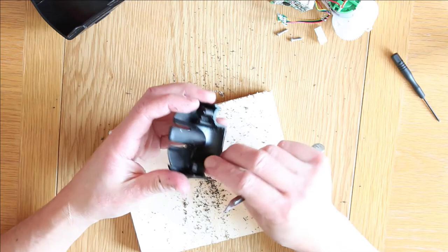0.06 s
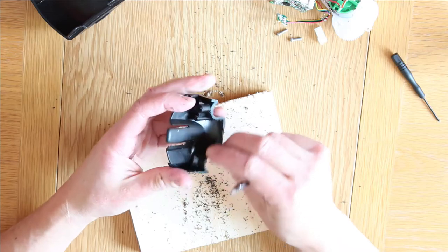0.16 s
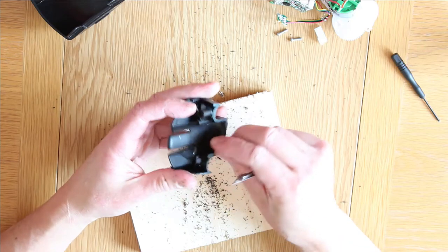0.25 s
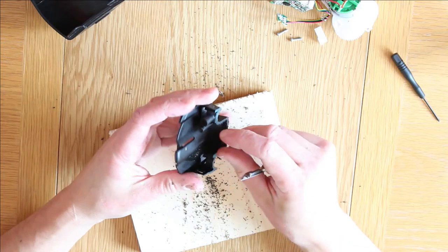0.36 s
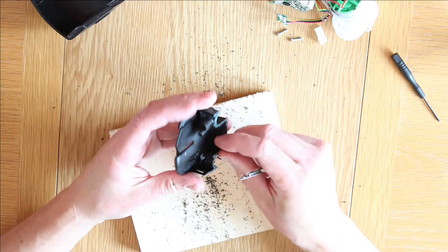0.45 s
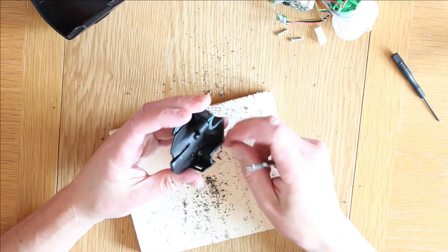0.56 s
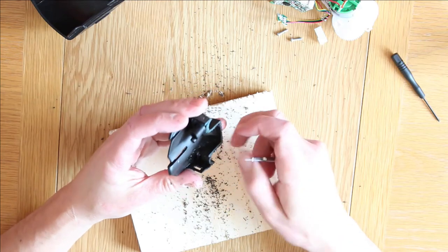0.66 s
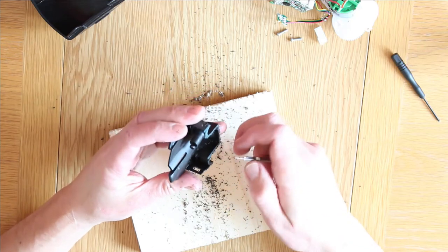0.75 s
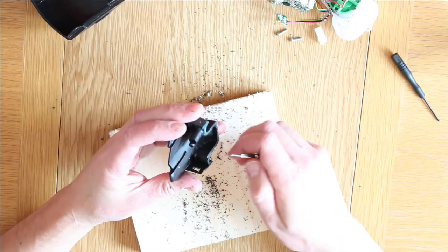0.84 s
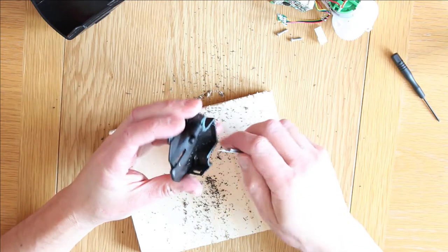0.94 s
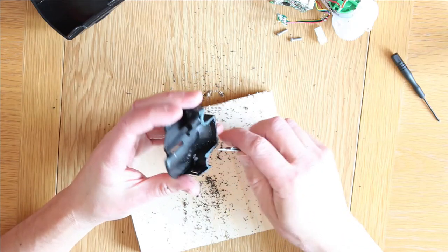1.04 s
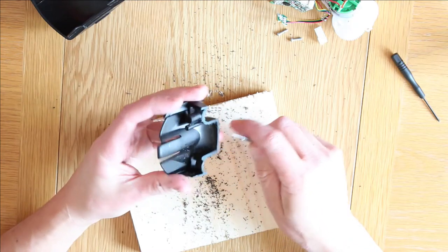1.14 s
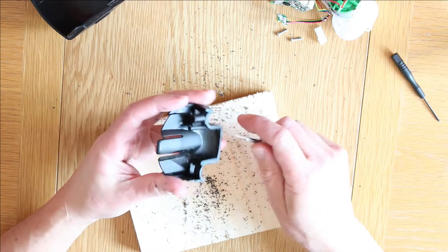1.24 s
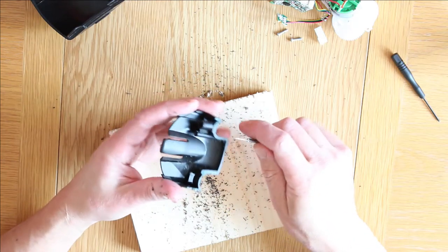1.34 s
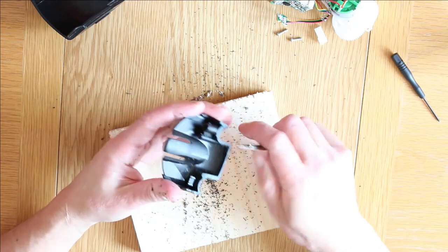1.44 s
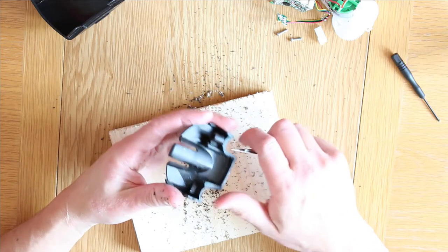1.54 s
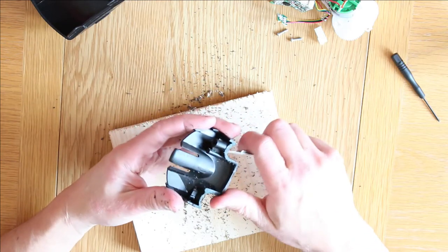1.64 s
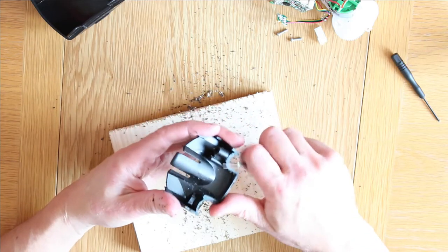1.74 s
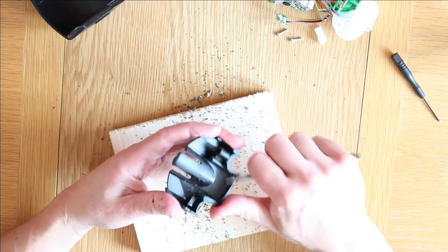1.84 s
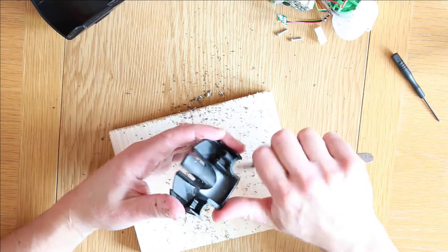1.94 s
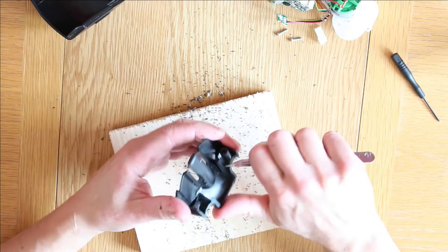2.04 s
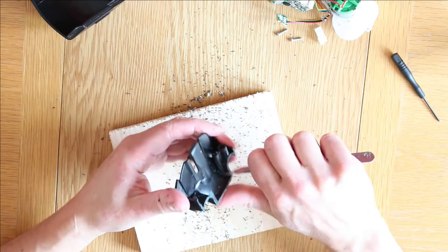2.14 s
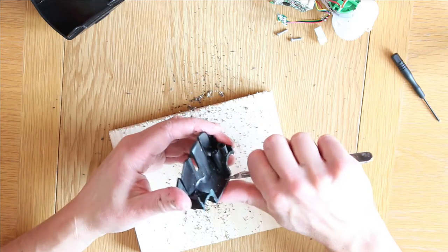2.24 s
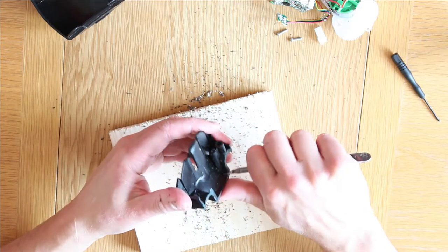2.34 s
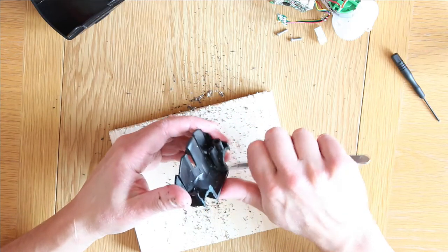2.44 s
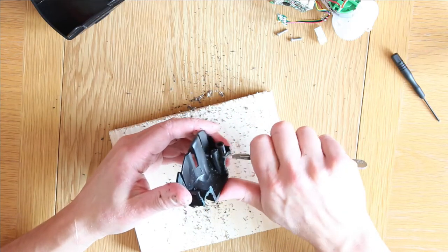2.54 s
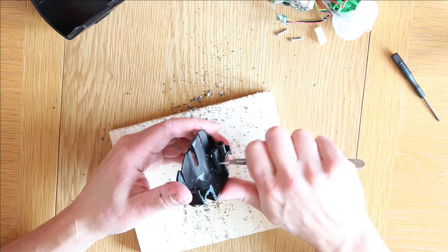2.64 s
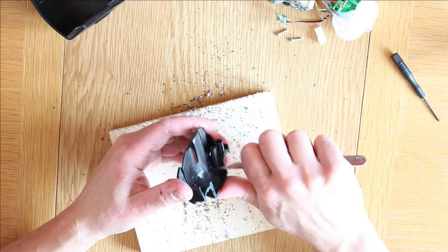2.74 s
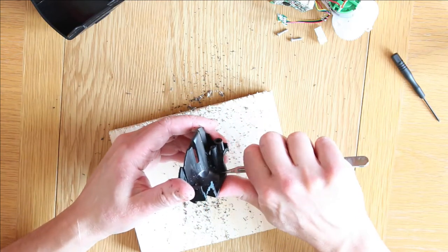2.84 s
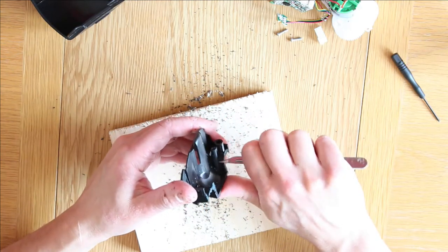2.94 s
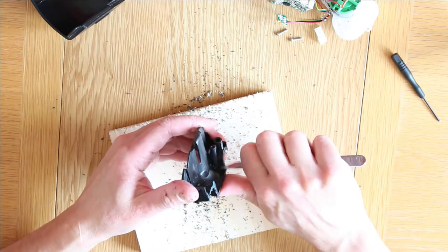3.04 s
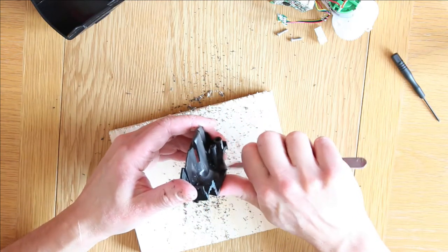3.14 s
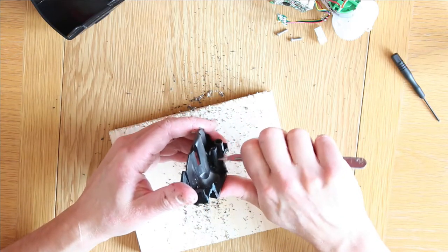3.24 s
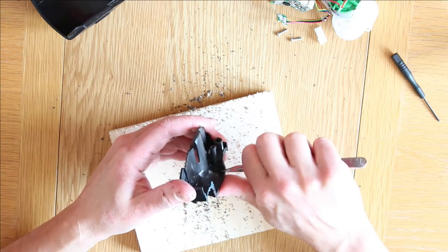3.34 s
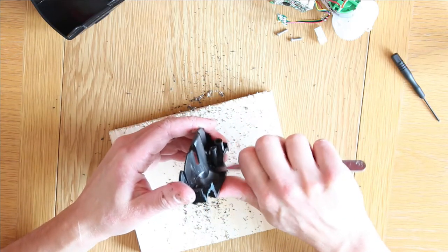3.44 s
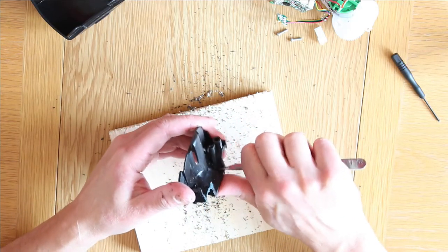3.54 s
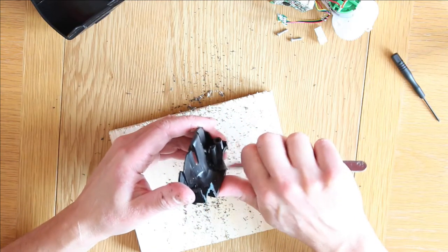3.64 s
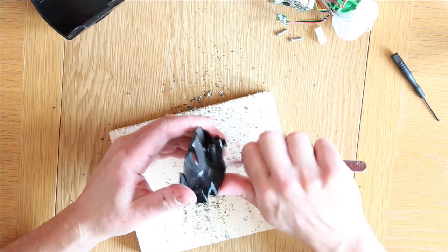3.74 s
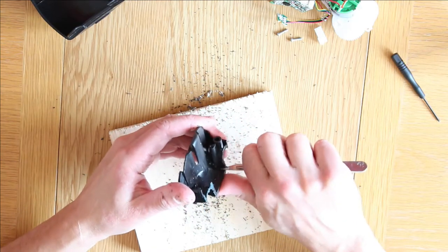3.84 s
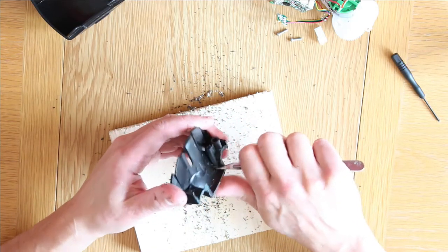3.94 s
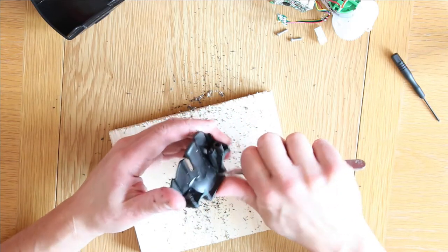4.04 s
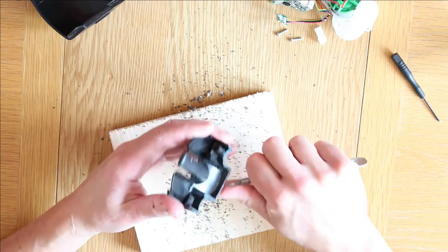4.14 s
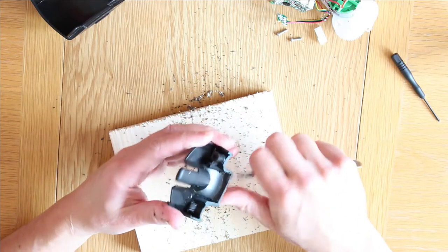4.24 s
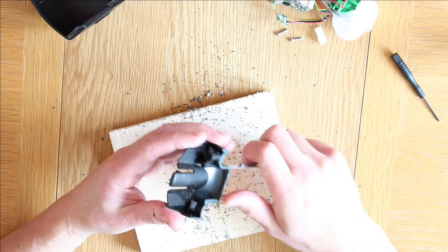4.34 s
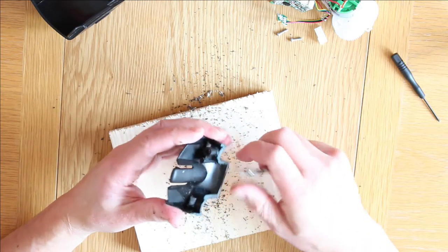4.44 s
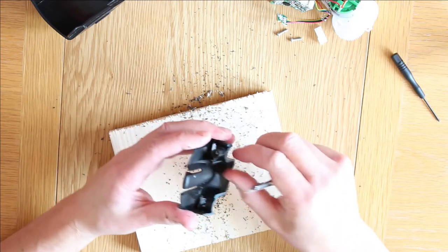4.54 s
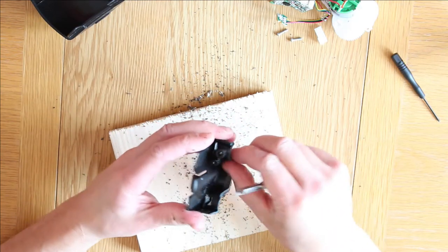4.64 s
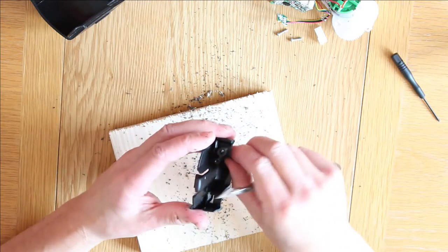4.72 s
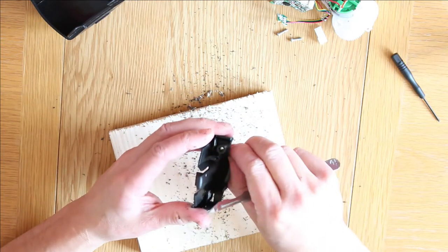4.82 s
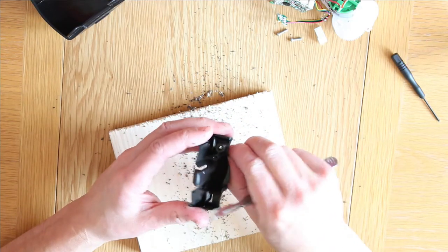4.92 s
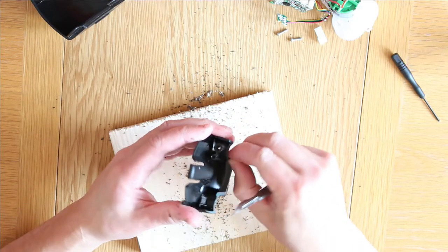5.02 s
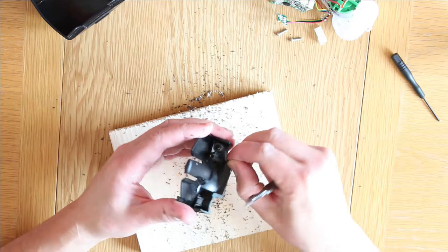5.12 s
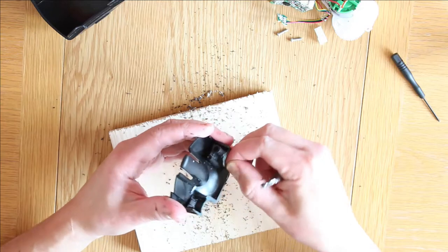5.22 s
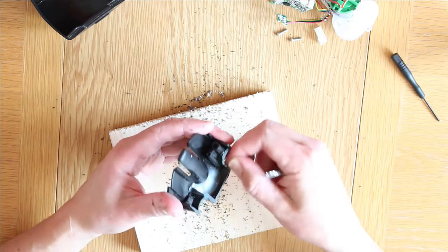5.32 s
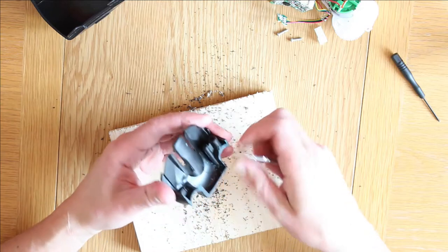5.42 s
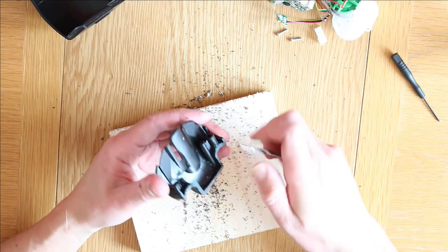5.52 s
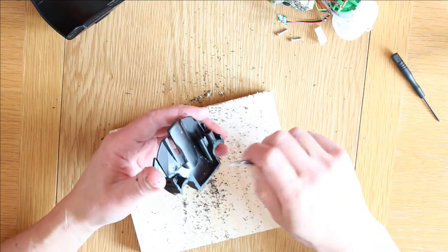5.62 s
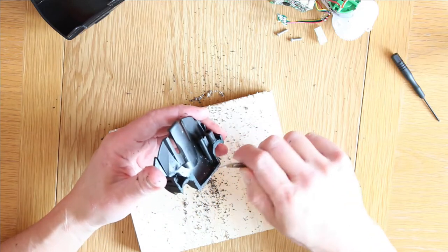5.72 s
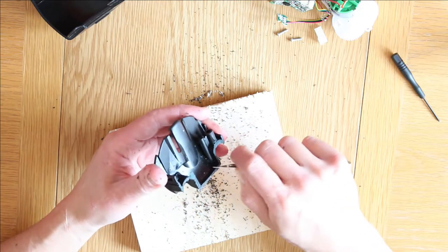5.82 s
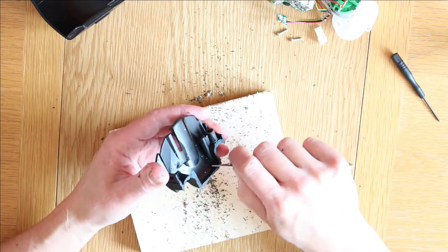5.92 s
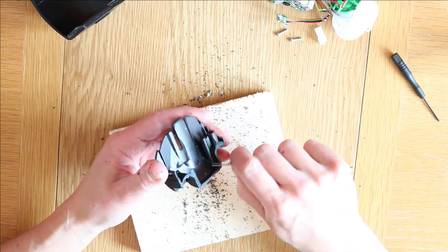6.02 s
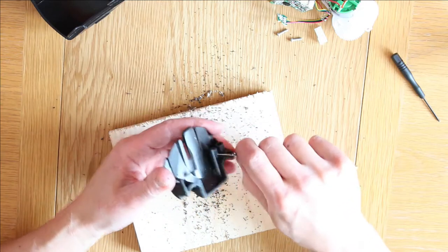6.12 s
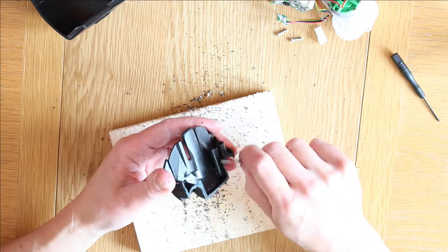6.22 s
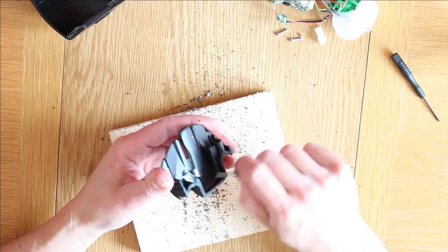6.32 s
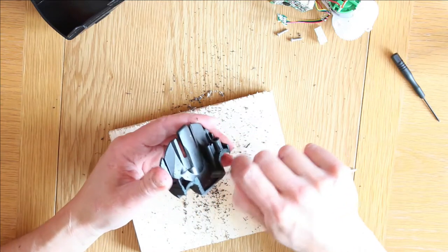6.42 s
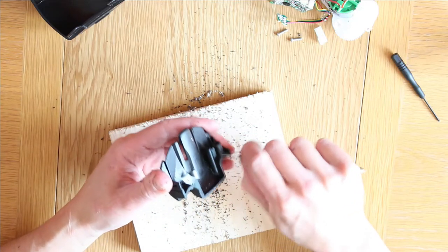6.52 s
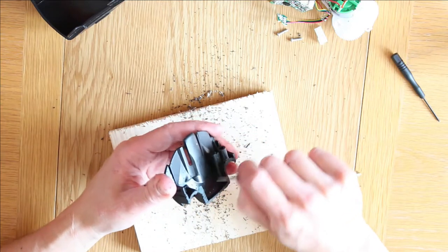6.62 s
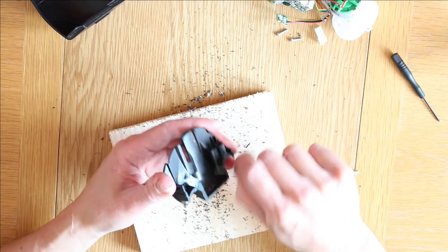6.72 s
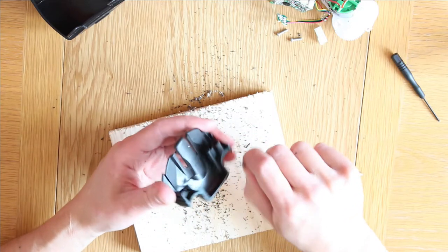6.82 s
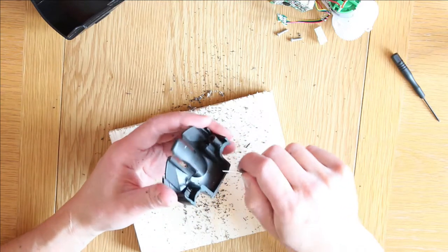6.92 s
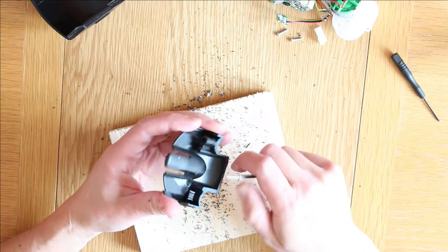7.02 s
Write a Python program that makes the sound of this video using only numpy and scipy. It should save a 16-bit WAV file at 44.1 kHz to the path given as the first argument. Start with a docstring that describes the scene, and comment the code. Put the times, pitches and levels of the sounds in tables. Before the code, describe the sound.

A small steel blade works on a light, hollow plastic shell held in the hand, in a small room with a short diffuse echo, slightly left of centre. Soft hiss runs throughout, with a barely perceptible low hum fading at the start. Until 1.8 s it is almost silent: faint scuffs at 0.07 and 0.2 s, a tiny squeak and soft scrape near 0.7 s. A tick and woody scrape come at 1.8-1.9 s, light taps at 2.0-2.4, then two sharp, quick scratches around 2.5 s. Short gritty strokes follow unevenly from 2.75 to 4.2 s, strongest at 3.3, 3.55 and especially 3.8 s, each swelling and stopping abruptly. Quiet returns until faint taps at 5.9-6.0 s. A loud, bright, crackling scrape with a snap hits at 6.1 s, then a dense cluster at 6.4-6.6 s and a last rasp at 6.75 s, dying into hiss.

```python
"""A small knife scrapes burrs off a hand-held plastic shell, over a table in a small room.
The blade ticks onto the edge, then sticks and slips along it in short strokes; every slip is a
jerk of force that excites damped modes of shell and blade, coloured by the way of touching.
One faint squeak is a sine of unsteady frequency. Echoes and a diffuse tail of decaying noise form
the room; a faint hiss of coloured noise and a fading low sine hum run beneath."""
import sys
import numpy as np
from scipy import signal
from scipy.fft import rfft, irfft, next_fast_len
from scipy.io import wavfile

SR = 44100
rng = np.random.default_rng(int(sys.argv[2]) if len(sys.argv) > 2 else 0)


def pcm_store(signal):
    """Save signal as 16-bit PCM."""
    levels = np.round(np.clip(np.atleast_2d(signal), -1, 1) * 32767)
    wavfile.write(sys.argv[1], SR, levels.astype(np.int16).T)


N = 311787

EDGE_HZ = 3100   # crossover above which the keenness of the blade is heard
PAN_DB = 2.1   # added on the left and taken off on the right


def from_db(db):
    """Level as a logarithm of amplitude: 20 dB is a factor of ten in gain."""
    return 10 ** (np.asarray(db) / 20)


def pan(left_db):
    """Level difference between channels: left is raised and right lowered by left_db."""
    return from_db([[left_db], [-left_db]])


def at_hz(points, hz):
    """Linear interpolation of a table on a logarithmic frequency axis."""
    f, value = np.transpose(points)
    return np.interp(np.log(np.maximum(hz, 1)), np.log(f), value)


def unit_energy(x):
    """Normalisation of the summed squares to an average of one per channel."""
    mean_energy = np.mean(np.sum(x ** 2, axis=-1))
    return x / np.sqrt(mean_energy + 1e-20)


def add(track, s, x):
    """Superposition: mix stereo x into the track from time s (seconds) on."""
    i = max(int(s * SR), 0)
    track[:, i:i + x.shape[1]] += x[:, :N - i]


def stereo_noise(likeness, size):
    """Partial coherence: independent mid and side noises set the correlation at each frequency."""
    mid, side = rfft(rng.standard_normal((2, size)))
    alike = np.clip(at_hz(likeness, np.fft.rfftfreq(size, 1 / SR)), -.99, .99)
    mid = np.sqrt((1 + alike) / 2) * mid
    side = np.sqrt((1 - alike) / 2) * side
    return irfft(mid + side * [[1], [-1]], size)


def colour(spectrum, size=4096):
    """Minimum phase: folding the cepstrum gives a causal impulse response of this spectrum."""
    gain = from_db(at_hz(spectrum, np.fft.rfftfreq(size, 1 / SR)))
    cepstrum = irfft(np.log(gain))
    cepstrum[1:size // 2] *= 2
    cepstrum[size // 2 + 1:] = 0
    return unit_energy(irfft(np.exp(rfft(cepstrum))))


def convolve(a, b):
    """Linear system: the output is the input convolved with the impulse response."""
    return signal.fftconvolve(np.atleast_2d(a), np.atleast_2d(b), axes=1)[:, :N]


def shelf(x, hz, db, kind):
    """Crossover: split into two bands, change the level of one, and sum them again."""
    total = 0
    for side in ("low", "high"):
        # the same filter twice, so that the two bands sum flat
        sos = np.tile(signal.butter(2, hz, side, fs=SR, output="sos"), (2, 1))
        gain = from_db(db) if side == kind else 1
        total = total + signal.sosfilt(sos, x) * gain
    return total


def background(hiss_left_db=0.66, hum_right_db=-9):
    """Stationary noise: room and microphone hiss, over a low sine hum of exponential decay."""
    # relative spectrum of the hiss: f/Hz, level/dB
    hiss_spectrum = [(28, -2), (55, -10.5), (140, -4), (265, -5), (650, -8.5), (1300, -11.5), (4660, -17.5),
                     (10000, -24.5), (16000, -32.5)]
    # left-right coherence of the hiss: f/Hz, correlation
    hiss_likeness = [(60, -0.47), (300, -0.49), (1000, -0.65), (2400, -0.48), (8000, -0.075), (15000, 0.35)]
    hiss_db = -54.5
    hum_hz, hum_db, hum_fall_db_per_s = 26.9, -54, 8
    t = np.arange(N) / SR
    noise = stereo_noise(hiss_likeness, next_fast_len(N))[:, :N]
    hiss = from_db(hiss_db) * convolve(noise, colour(hiss_spectrum)) * pan(hiss_left_db)
    # the factor 2 puts the starting peak 6 dB above hum_db
    hum = from_db(hum_db - hum_fall_db_per_s * t) * 2 * np.sin(2 * np.pi * hum_hz * t)
    # opposite phase on the right, at hum_right_db relative to the left (-9 dB: a gain of about -0.35)
    return hiss + hum * np.array([[1], [-from_db(hum_right_db)]])


def room(tail_db=0.0, build_s=0.0049):
    """Reverberation: direct sound, near echoes, then a diffuse tail whose treble dies sooner."""
    # early wall echoes: left delay t/s, right delay t/s, level/dB against the direct sound
    echoes = [(.0036, 0.002, -24), (.0083, 0.016, -21.5)]
    # time for the tail to fall 60 dB: f/Hz, t/s
    decay_times = [(300, 0.42), (2000, 0.4), (5500, 0.43), (9000, 0.32), (15000, 0.34)]
    # left-right coherence of the tail: f/Hz, correlation
    tail_likeness = [(150, 1), (700, 0.72), (3000, 0.75), (6500, 0.3), (15000, 1)]
    t = np.arange(SR * 3 // 5) / SR
    hz, when, cells = signal.stft(stereo_noise(tail_likeness, len(t)), SR)
    decay = from_db(-60 * when / at_hz(decay_times, hz)[:, None])
    tail = signal.istft(cells * decay, SR)[1][:, :len(t)]
    response = from_db(tail_db) * unit_energy(tail * np.minimum(t / build_s, 1))
    response[:, 0] += 1   # direct sound
    for left_s, right_s, db in echoes:
        response[[0, 1], [int(left_s * SR), int(right_s * SR)]] += from_db(db)
    return unit_energy(response)


def squeak(jitter_hz=900):
    """Frequency modulation: the blade sings once, briefly and faintly, at an unsteady pitch."""
    at_s, squeak_s, centre_hz, peak_db = 0.68, 0.057, 5650, -60
    size = int(squeak_s * SR)
    hz = centre_hz + jitter_hz * rng.standard_normal(SR // 4)[:size]
    phase = 2 * np.pi * np.cumsum(hz) / SR
    song = from_db(peak_db) * np.hanning(size) * np.sin(phase)
    track = np.zeros((2, N))
    add(track, at_s, song * pan(PAN_DB))
    return track


def resonate(x):
    """Modal resonance: sharp modes of shell and blade ring on; a small shell radiates little bass."""
    # modes of the plastic shell and steel blade: f/Hz, bandwidth f/Hz, lift level/dB
    modes = [(665, 24, 5), (916, 22, 6), (1320, 30, 3), (2076, 27, 5), (2486, 27, 5), (2900, 40, 2),
             (5236, 16, 4), (5374, 16, 6), (5481, 16, 5), (5667, 16, 10), (5834, 16, 6), (5953, 16, 8),
             (6037, 12, 5), (7149, 16, 5), (7885, 30, 5), (8537, 27, 5), (8740, 27, 5)]
    bass_hz = 139
    for hz, width, lift_db in modes:
        mode = signal.lfilter(*signal.iirpeak(hz, hz / width, fs=SR), x)
        x = x + (from_db(lift_db) - 1) * mode
    return signal.sosfilt(signal.butter(2, bass_hz, "high", fs=SR, output="sos"), x)


def tick(db, tick_s=0.0088, catch_s=.005, catch_db=2):
    """Impact: the blade touches, skids and catches, with the energy of tick_s of noise at level db."""
    force = np.zeros(int(catch_s * rng.uniform(.8, 1.2) * SR) + 2)
    force[[0, -1]] = 1, from_db(catch_db)
    return from_db(db) * np.sqrt(tick_s * SR) * unit_energy(force)


def stroke(rise_s, peak_db, slips_per_s=420, uneven=.7, spread_db=2.5, rub_db=-9, swell_power=2.1, count=256):
    """Stick-slip friction: uneven jerks over a fine rub follow the pressure until the blade lifts."""
    swell_db, release_db, release_s = 12, 16.5, 0.032
    chatter_db, chatter_per_s = 1.0, 89   # depth and rate of the flutter in pressure
    t = np.arange(int((rise_s + release_s) * SR)) / SR
    gaps, sizes, flutter = rng.standard_normal((3, count))
    swell = swell_db * np.maximum(1 - t / rise_s, 0) ** swell_power
    release = release_db * np.maximum(t - rise_s, 0) / release_s
    chatter = chatter_db * np.interp(t * chatter_per_s, np.arange(count), flutter)
    pressure = from_db(peak_db - swell - release + chatter)
    rub = rng.standard_normal(SR // 2)[:len(t)]
    # log-normal waits between slips; the first slip comes at once
    waits = np.exp(uneven * gaps) / slips_per_s
    at = ((np.cumsum(waits) - waits[0]) * SR).astype(int)
    jerks = from_db(spread_db * sizes) * rng.choice([-1, 1], count)
    within = at < len(t)
    slips = np.zeros(len(t))
    slips[at[within]] = jerks[within]
    slips = unit_energy(slips) * np.sqrt(len(t))   # mean square of one
    return pressure * (slips + from_db(rub_db) * rub)


def shell_ring(force, ring_t60=0.061, crack_db=-4.5, size=3000):
    """Dense damped modes: each jerk cracks, then rings like noise as the moving blade mixes the modes."""
    # left-right coherence of the ring: f/Hz, correlation
    ring_likeness = [(200, 0.36), (700, 1), (3000, 0.57), (6500, 0.055), (15000, 0.47)]
    force = np.pad(force, (0, size))
    keep = from_db(-120 / (ring_t60 * SR))   # share of the energy left after each sample
    energy = signal.lfilter([1 - keep], [1, -keep], force ** 2)
    ring = np.sqrt(energy) * stereo_noise(ring_likeness, SR // 2)[:, :len(force)]
    crack = from_db(crack_db) * force
    return (ring + crack) / np.hypot(1, from_db(crack_db))


def contact(force, thump_db, edge_db, bite_s=0):
    """Spectral tilt: a deep bite drives the bass, a keen blade angle the treble, rising over bite_s."""
    thump_hz = 970
    bite_db = 6.5   # the blade lands flat and dull: treble missing against the rest until it bites
    sound = shelf(shell_ring(force), thump_hz, thump_db, "low")
    if bite_s:
        t = np.arange(sound.shape[1]) / SR
        edge_db = edge_db - np.interp(t, [0, bite_s], [bite_db, 0])
    # half the lift is taken off the whole, so the tilt pivots about the crossover
    return shelf(sound, EDGE_HZ, edge_db, "high") * from_db(-edge_db / 2)


def knife(landing_edge_db=-7, bass_left_db=0.6):
    """Source and filter: strokes and ticks drive the shell, left of centre, more so below EDGE_HZ."""
    # strokes of the blade: start t/s, time to full pressure t/s, level/dB at full pressure,
    # landing tick level/dB, thump level/dB, edge level/dB, touch
    strokes = [ (0.068, .012, -57, -62, 6, -5, "scuff"), (0.220, 0.12, -66, -60, 8, 6, "scuff"),
               (0.735, 0.028, -64, -72, -10, 0, "knock"), (1.859, .02, -35, -46, -3, 3.5, "corner"),
               (2.4842, 0.0056, -31, -33, -0.5, 4, "back"), (2.540, 0.0033, -28, -24, -13, 4, "tip"),
               (2.777, 0.044, -38.5, -50.5, 5.5, -8, "edge"), (3.044, .035, -36.5, -48, 7, 2.5, "edge"),
               (3.233, 0.016, -37.5, -43, -5, -1, "back"), (3.321, 0.011, -28.5, -43, 6.5, 2.5, "edge"),
               (3.551, 0.029, -31, -51, 3, -0.5, "edge"), (3.686, .025, -49, -67, -15, -5, "back"),
               (3.799, 0.0088, -23.5, -35, -1.5, -0.5, "deep"),
               (4.050, 0.0061, -36, -36.5, -4.5, -0.5, "scuff"), (4.137, 0.026, -39, -37, 8.5, 3, "edge"),
               (6.092, 0.054, -20.5, -44, 3, -1, "tip"), (6.470, 0.044, -33, -35.5, 3.5, -12, "tip"),
               (6.502, 0.081, -25, -29, -8.5, 1, "tip"), (6.7371, 0.056, -30, -31, 0.5, -5, "tip")]
    # lone taps of the blade and snapping burrs: t/s, level/dB, thump level/dB, edge level/dB, touch
    lone_ticks = [ (1.805, -33.5, 1, -2.5, "corner"), (2.010, -48, 9, 1, "scuff"),
                  (2.090, -48.5, 2, 1, "scuff"), (2.384, -56, 0, -14, "scuff"),
                  (2.743, -51, -2, -19, "scuff"), (2.811, -39, -8, -9, "edge"),
                  (3.017, -50, -2, 12, "edge"), (3.198, -46.5, -1, -6, "back"),
                  (3.536, -46, -8, -4, "edge"), (3.769, -44.5, -10, 4, "edge"),
                  (5.895, -67, 18, -1, "knock"), (5.986, -47.5, 1, 5, "corner"),
                  (6.141, -19.5, 0, 2.5, "tip"), (6.411, -41, 7, 3, "knock"), (6.540, -21, 4, 4.5, "tip")]
    # relative spectrum of each way of touching the shell: f/Hz, level/dB
    touches = {
        "corner": [(150, -21), (400, -4), (520, -2), (660, 0.5), (830, -1), (1100, -10.5), (1360, 1),
                   (1830, -15), (2600, 1.5), (3500, -13), (5600, -12), (8400, -14.5), (16000, -35)],
        "edge": [(150, -32.5), (400, -15), (620, -13.5), (880, -19.5), (1250, -4.5), (1900, -10.5),
                 (2500, -1.5), (3000, 4), (3550, -6), (5000, -1), (6600, -3.5), (8700, -8), (10500, -13.5),
                 (16000, -25.5)],
        "tip": [(130, -33), (330, -12.5), (680, -7.5), (1100, -6), (2100, -4.5), (2700, -0.5), (3400, -5),
                (4900, -1), (5500, 5), (6400, -1.5), (8900, 2), (9900, -13), (13200, -10.5), (14200, -29)],
        "back": [(300, -10), (850, -18), (1170, 6), (1400, -3), (1620, -3), (2050, -13.5), (3050, 0.5),
                 (3600, -8), (5400, -2.5), (6400, -8), (7800, -4.5), (9200, -14), (12000, -13),
                 (16000, -25)],
        "deep": [(200, -30), (450, -15.5), (850, -26.5), (1100, -14.5), (1310, -1.5), (1650, -19),
                 (2100, -7), (2550, 1.5), (3600, -7.5), (4750, 0.5), (6300, -6.5), (8500, -8), (10500, -21),
                 (16000, -30)],
        "knock": [(200, -18), (650, 0), (1700, -4), (2700, 1), (3400, -22), (8000, -34), (16000, -44)],
        "scuff": [(400, -16), (1300, -8), (2000, -13.5), (2850, 5), (3700, -7.5), (5600, -5), (9000, -18),
                  (16000, -30)]}
    tracks = {touch: np.zeros((2, N)) for touch in touches}
    for start, rise_s, peak_db, landing_db, thump_db, edge_db, touch in strokes:
        landing = contact(tick(landing_db), thump_db, edge_db + landing_edge_db)
        add(tracks[touch], start, landing)
        scrape = contact(stroke(rise_s, peak_db), thump_db, edge_db, rise_s)
        add(tracks[touch], start, scrape)
    for s, db, thump_db, edge_db, touch in lone_ticks:
        add(tracks[touch], s, contact(tick(db), thump_db, edge_db))
    coloured = sum(convolve(tracks[touch], colour(spectrum)) for touch, spectrum in touches.items())
    shell = resonate(coloured)
    return shelf(shell, EDGE_HZ, [[bass_left_db], [-bass_left_db]], "low") * pan(PAN_DB)


def scene():
    """Superposition: knife and squeak sound in the room, over the background."""
    return convolve(knife() + squeak(), room()) + background()


def record(dry):
    """Band limiting: a steep elliptic low-pass cuts the top."""
    cutoff_hz = 15900
    # order 10, 0.2 dB ripple below the cutoff, 80 dB rejection above
    return signal.sosfilt(signal.ellip(10, .2, 80, cutoff_hz, fs=SR, output="sos"), dry)


dry = scene()
out = record(dry)
pcm_store(out)
```